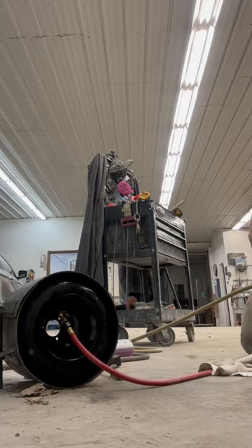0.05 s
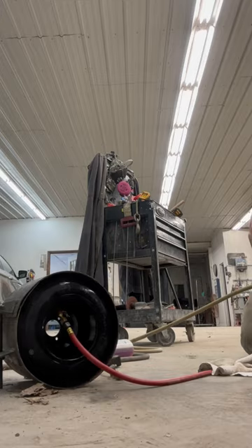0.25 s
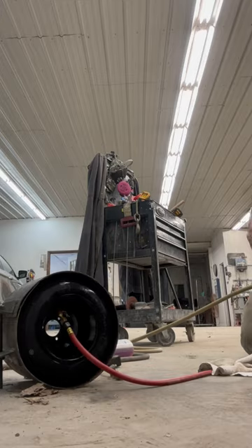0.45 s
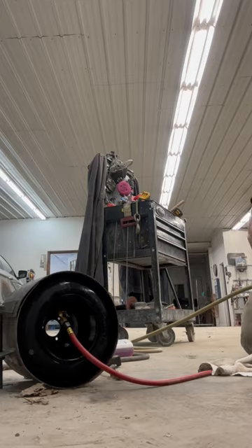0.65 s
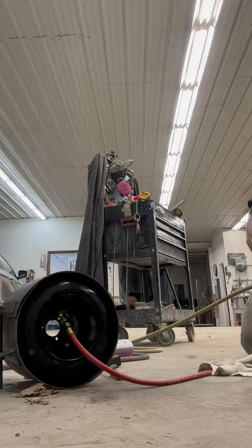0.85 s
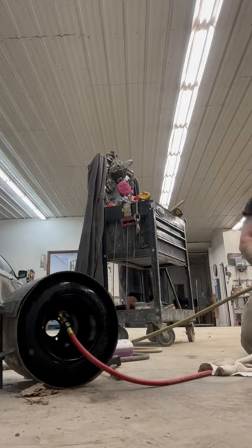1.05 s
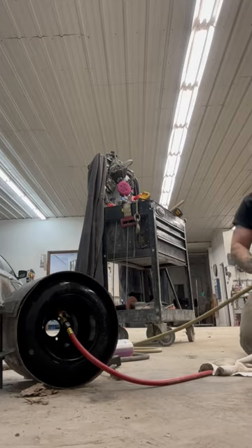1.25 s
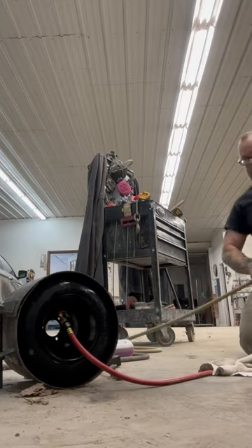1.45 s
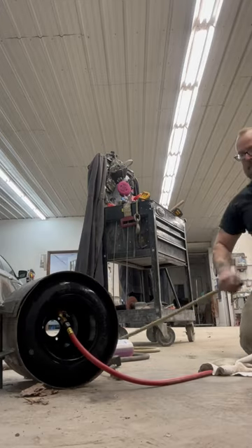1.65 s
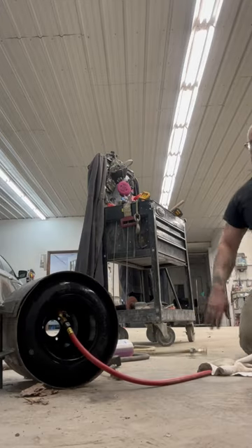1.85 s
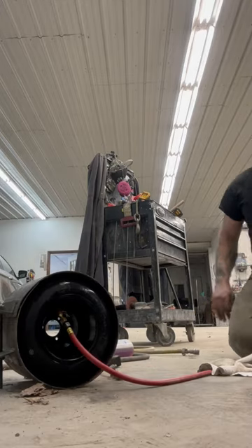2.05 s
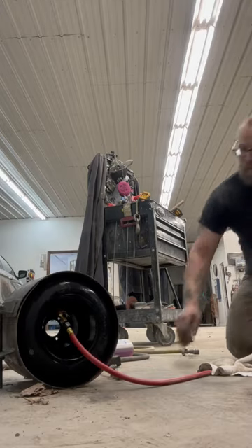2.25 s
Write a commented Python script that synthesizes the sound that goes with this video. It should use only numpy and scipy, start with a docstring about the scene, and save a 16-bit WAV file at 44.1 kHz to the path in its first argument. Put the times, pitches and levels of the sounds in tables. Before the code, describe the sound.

Compressed air hisses and a tyre bead pops twice onto a rim in a workshop.

```python
"""A tyre is inflated on a steel rim in a large workshop, over a low rumble and faint hum.
Air hisses at the valve. At 0.23 s the bead jumps with a crack and the sidewall snaps outward;
air rushes past the ringing rim and dies away. The hiss returns; at 1.5 s the bead pops again.
At 1.9 s the hose's metal air chuck drops on the concrete and chatters. Last, the rim ticks lightly."""
import sys
import numpy as np
from scipy import signal
from scipy.fft import rfft, irfft
from scipy.io import wavfile

SR = 44100
rng = np.random.default_rng(int(sys.argv[2]) if len(sys.argv) > 2 else 0)


def int16_out(signal):
    """Quantize to a 16-bit WAV file."""
    q = np.round(np.clip(np.atleast_2d(signal).T, -1, 1) * 32767)
    wavfile.write(sys.argv[1], SR, q.astype(np.int16))


N = 101429
T = np.arange(N) / SR
FREQS = np.fft.rfftfreq(2 * N, 1 / SR)

# Hall decay. Each row: frequency in Hz, T60 in seconds.
HALL_T60 = [(60, .6), (250, .8), (800, .95), (3000, .85), (8000, .57), (16000, .25)]
# Hall width. Each row: frequency in Hz, side minus mid in dB.
HALL_WIDTH = [(60, -15), (250, -8), (600, -6), (1300, 0), (2300, -1), (5000, -5), (8000, -13), (16000, -9)]
# Shop hum. Each row: frequency in Hz, level in dB.
HUM_TONES = [(328.4, -78)]
# Envelopes of rumble, valve air and bead air. Each row: time in seconds, level in dB.
RUMBLE_ENVELOPE = [(0, -62), (.8, -80.5), (1.0, -67.5), (1.4, -67.5), (1.84, -61), (1.9, -55.5),
                   (2.12, -59), (2.3, -55)]
VALVE_ENVELOPE = [(0, -48.5), (.215, -49), (.25, -96), (.5, -95), (.63, -72), (1.15, -72.5), (1.35, -67),
                  (1.43, -53.5), (1.66, -54.5), (1.76, -58), (1.79, -81), (2.1, -100)]
BEAD_ENVELOPE = [(.19, -61.5), (.21, -36.5), (.235, -37), (.255, -36.5), (.34, -39.5), (.41, -36),
                 (.63, -35.5), (.73, -42), (.87, -49), (1.05, -59.5), (1.3, -72)]
# Noise spectra of the sources. Each row: frequency in Hz, relative density in dB.
RUMBLE_SPECTRUM = [(25, -28), (60, 3), (95, 6), (130, 2.5), (175, 4.5), (260, -11.5), (600, -10.5),
                   (1300, -16.5), (3000, -15), (8000, -37), (16000, -64)]
TICK_SPECTRUM = [(600, 8.5), (1500, -2), (2150, 12), (2800, 0), (3800, -23), (9000, -33)]
KNOCK_SPECTRUM = [(60, -12), (500, 4.5), (1300, -1.5), (2700, 5), (4500, 2.5), (7000, 1.5), (12000, -9.5),
                  (16000, -17)]
JET_SPECTRUM = [(100, -15), (600, -1), (1500, 4.5), (2400, 6.5), (4200, 8), (6100, 8), (7200, 0.5),
                (10500, 13.5), (14000, 13), (16000, -11)]
BEAD_GAP_SPECTRUM = [(60, -23.5), (220, -15), (400, -2), (750, 1.5), (1300, -4), (2100, 5), (2800, -12),
                     (3400, -12), (5000, -21.5), (7000, -50.5), (10000, -63), (16000, -44)]
CRACK_SPECTRUM = [(100, -10), (400, 9.5), (900, -30), (1900, 4), (2800, -5.5), (4500, -10), (8000, -18.5),
                  (16000, -40)]
SPIT_SPECTRUM = [(500, -6), (2500, -18.5), (4500, 12.5), (12000, 17), (16000, 6.5)]
# Rim and wheel well modes. Each row: frequency in Hz, width in Hz (floored at 45),
# relative level in dB when driven at the bead, the same when driven at the valve.
RIM_MODES = [(1968, 65, 3.5, 3), (2105, 33, -3.5, -3), (2393, 69, -10, -2.5), (2780, 81, -6.5, 1),
             (4950, 85, -22.5, -3), (6023, 300, -26.5, -0.5), (12930, 50, -60.5, -10)]
# Rim ticks. Each row: time in seconds, level in dB.
RIM_TICKS = [(2.2198, -45), (2.224, -44.5), (2.2375, -40.5), (2.255, -50)]
# Chuck modes. Each row: frequency in Hz, relative level in dB, T60 in seconds.
CHUCK_MODES = [(7912, 0, .052), (8200, -10, .055), (11380, -29, .02), (2850, -24, .04), (1960, -25, .04),
               (522, -33, .6)]
# Chuck on concrete. Each row: time in seconds, knock level in dB, ring level in dB.
CHUCK_BOUNCES = [(1.8763, -33, -28), (1.8805, -33, -16), (1.8845, -38, -38), (1.8932, -31, -25),
                 (1.910, -38, -33), (1.9285, -40, -44), (1.946, -43, -50)]
# Loose bead hitting the rim. Each row: time in seconds, relative level in dB.
BEAD_CHATTERS = [(.211, -33), (.317, -32), (.536, -36), (.629, -36)]
# Bead cracks. Each row: time in seconds, level in dB, rise and decay in seconds,
# relative rim ring in dB, hall send in dB.
BEAD_CRACKS = [(0.228, -16.5, 0.002, .0011, -5, -8), (0.244, -28.5, 0.002, 0.0018, -6.5, -0.5),
               (1.4809, -39, 0.00033, 0.001, -6, 8.5), (1.4955, -34.5, 0.00043, 0.0027, -11.5, -1)]
# Air spat as the bead jumps. Each row: time in seconds, level in dB, decay in seconds.
AIR_SPITS = [(0.2258, -21, 0.00093), (1.4824, -31.5, 0.0011), (1.494, -24.5, 0.0014)]
# Sidewall snaps. Each row: start in seconds, start and end pitch in Hz, swell in seconds,
# level in dB, hall send in dB.
SIDEWALL_SNAPS = [(.2152, 235, 158, 0.0025, -23, -15), (.2267, 1060, 590, 0.00049, -9, -7.5),
                  (.236, 140, 54.7, 0.0037, -29, -12), (.297, 60.6, 53, 0.0091, -39.5, -6),
                  (1.4942, 810, 665, 0.0011, -20.5, -0.5), (1.4973, 447, 55, 0.0029, -20, -6),
                  (1.512, 110, 65.5, 0.0044, -39, -10)]
# Microphone port balance. Each row: frequency in Hz, left minus right in dB.
PORT_BALANCE_DB = [(250, 0.5), (2200, -0.8), (4500, -0.16)]
# Microphone port phase. Each row: frequency in Hz, left minus right in radians.
PORT_PHASE_RAD = [(30, 0), (250, -.1), (700, -.25), (2500, -.6), (4500, -1.2), (6000, -1.7), (7900, -3.08),
                  (11800, -6.3), (14000, -8.2), (15500, -9.4)]

SEATED_S = 0.24  # first pop


def amp(db):
    """Decibels to gain."""
    return 10 ** (np.asarray(db) / 20)


def unit(x):
    """Scale to rms 1."""
    return x / np.sqrt(np.mean(x ** 2))


def curve(rows):
    """Gain over time from (s, dB) points."""
    return amp(np.interp(T, *np.array(rows).T))


def at_hz(points, hz):
    """Read (Hz, value) points on a log axis."""
    points_hz, values = np.array(points).T
    return np.interp(np.log(hz + 1e-3), np.log(points_hz), values)


def shape(x, response):
    """Apply a frequency response."""
    return irfft(rfft(x, 2 * N) * response)[..., :N]


def noise(spectrum):
    """Coloured noise at rms 1."""
    return unit(shape(rng.standard_normal(N), amp(at_hz(spectrum, FREQS))))


def drift(rate_hz):
    """Smooth random signal, spread near 1."""
    return 1.2 * np.interp(T * rate_hz, np.arange(2000), rng.standard_normal(2000))


def burst(x, at_s, rise_s, decay_s):
    """Noise burst with the energy of its envelope."""
    env = np.exp(-np.maximum((at_s - T) / rise_s, (T - at_s) / decay_s))
    return x * env * np.sqrt(np.sum(env ** 2) / np.sum((x * env) ** 2))


def mode(at_s, hz, t60_s):
    """Decaying sine of one struck mode."""
    age_s = np.maximum(T - at_s, 0)
    return np.sin(2 * np.pi * hz * age_s) * amp(-60 * age_s / t60_s)


def hall_response():
    """Stereo echo of the hall: treble dies first, bass is alike on both sides."""
    centres_hz, build_s = np.geomspace(60, 16000, 9), 0.0031
    mid, side = rng.standard_normal((2, N))
    width = amp(at_hz(HALL_WIDTH, FREQS))
    norm = np.hypot(1, width)
    pair = shape(mid, 1 / norm) + np.array([[1], [-1]]) * shape(side, width / norm)
    tail = 0
    for hz, weights in zip(centres_hz, np.eye(len(centres_hz))):
        band = shape(pair, at_hz(list(zip(centres_hz, weights)), FREQS))
        tail += band * amp(-60 * T / at_hz(HALL_T60, hz))
    onset = 1 - np.exp(-T / build_s)
    return rfft(tail * onset / np.sqrt(SR / np.log(1e6)), 2 * N)


def place(x, hall, send_db):
    """Direct sound plus the hall."""
    return shape(x, 1 + amp(send_db) * hall)


def shop_background(hall):
    """Low rumble and a faint wavering hum."""
    hum = sum(amp(db + 2 * drift(7.5)) * np.sin(2 * np.pi * hz * T) for hz, db in HUM_TONES)
    rumble = noise(RUMBLE_SPECTRUM) * curve(RUMBLE_ENVELOPE)
    return place(rumble, hall, send_db=-10.5) + np.sqrt(2) * hum


def rim_ring(at_valve=False):
    """Rim resonances driven by noise, at rms 1."""
    power = 0
    for hz, width_hz, bead_db, valve_db in RIM_MODES:
        loss = 1j * FREQS * max(width_hz, 45)
        gain = amp(valve_db if at_valve else bead_db)
        power += np.abs(gain * loss / (hz ** 2 - FREQS ** 2 + loss)) ** 2
    return unit(shape(rng.standard_normal(N), np.sqrt(power)))


def rim_ticks(hall):
    """Light contacts ring the rim briefly."""
    body = unit(noise(TICK_SPECTRUM) + amp(-3.5) * rim_ring())
    ticks = sum(amp(db) * burst(body, at_s, rise_s=0.00066, decay_s=0.002) for at_s, db in RIM_TICKS)
    return place(ticks, hall, send_db=-1)


def chuck_drop(hall):
    """Each bounce of the air chuck knocks on the concrete and rings the metal."""
    knocks, rings, contact = 0, 0, noise(KNOCK_SPECTRUM)
    for at_s, knock_db, ring_db in CHUCK_BOUNCES:
        knocks += amp(knock_db) * burst(contact, at_s, rise_s=0.00035, decay_s=0.0015)
        rings += sum(amp(ring_db + db) * mode(at_s, hz, t60_s) for hz, db, t60_s in CHUCK_MODES)
    return place(knocks, hall, send_db=1.5) + place(rings, hall, send_db=-11)


def valve_hiss(hall):
    """A bright jet rings the rim, most while the bead is still loose."""
    ring_db = np.where(T < SEATED_S, 2, -6.5)
    air = noise(JET_SPECTRUM) + amp(ring_db) * rim_ring(at_valve=True)
    flicker_db = 0.34 * drift(rate_hz=34.3)
    return place(air * amp(flicker_db) * curve(VALVE_ENVELOPE), hall, send_db=-1.5)


def bead_rush(hall):
    """Air flutters out between rubber and steel; the bead chatters and rings the rim."""
    ring_db, send_db, chatter_top_hz = -4.5, -5.5, 3500
    ring = rim_ring()
    throb = unit(ring * amp(2.2 * drift(rate_hz=70)))
    air = noise(BEAD_GAP_SPECTRUM) + amp(ring_db) * throb
    flutter_db = 0.9 * drift(rate_hz=110)
    rush = unit(air * amp(flutter_db)) * curve(BEAD_ENVELOPE)
    # Rubber on steel makes little treble.
    dull_ring = unit(shape(ring, 1 / (1 + (FREQS / chatter_top_hz) ** 2) ** 2))
    chatter = sum(amp(db) * burst(dull_ring, at_s, rise_s=0.003, decay_s=0.003)
                  for at_s, db in BEAD_CHATTERS)
    return place(rush + chatter, hall, send_db) / np.hypot(1, amp(send_db))


def sidewall(hall):
    """The sidewall snaps outward, pitch falling; the tyre rocks after the first pop."""
    snaps = 0
    for at_s, start_hz, end_hz, swell_s, db, send_db in SIDEWALL_SNAPS:
        progress = np.maximum(T - at_s, 0) / swell_s
        hz = end_hz + (start_hz - end_hz) * np.exp(-progress / 2)
        phase_rad = 2 * np.pi * np.cumsum(hz * (progress > 0)) / SR
        swing = -progress * np.exp(1 - progress) * np.sin(phase_rad)
        snaps += amp(db) * place(swing, hall, send_db)
    rocking = amp(-50) * mode(SEATED_S, hz=46.8, t60_s=1.72)
    return snaps + rocking


def bead_pops(hall):
    """The jumping bead slaps the rim, rings it and spits air."""
    pops, slap, spit, ring = 0, noise(CRACK_SPECTRUM), noise(SPIT_SPECTRUM), rim_ring()
    for at_s, db, rise_s, decay_s, ring_db, send_db in BEAD_CRACKS:
        crack = burst(slap, at_s, rise_s, decay_s)
        ringing = amp(ring_db) * burst(ring, at_s, rise_s, decay_s=0.0043)
        pops += amp(db) * place(crack + ringing, hall, send_db)
    for at_s, db, decay_s in AIR_SPITS:
        puff = burst(spit, at_s, rise_s=0.00027, decay_s=decay_s)
        pops += amp(db) * place(puff, hall, send_db=-10.5)
    return pops


def scene():
    """All sources in one hall."""
    hall = hall_response()
    tyre = valve_hiss(hall) + bead_rush(hall) + bead_pops(hall) + sidewall(hall)
    return tyre + chuck_drop(hall) + rim_ticks(hall) + shop_background(hall)


def record(dry):
    """A phone's two ports differ slightly in level and, towards the treble, in phase; the top is cut."""
    top_hz = 15800
    left_gain = amp(at_hz(PORT_BALANCE_DB, FREQS) / 2)
    ports = np.array([left_gain * np.exp(1j * at_hz(PORT_PHASE_RAD, FREQS)), 1 / left_gain])
    lowpass = signal.ellip(8, .2, 70, top_hz, fs=SR, output="sos")
    return signal.sosfilt(lowpass, shape(dry, ports))


dry = scene()
out = record(dry)
int16_out(out)
```